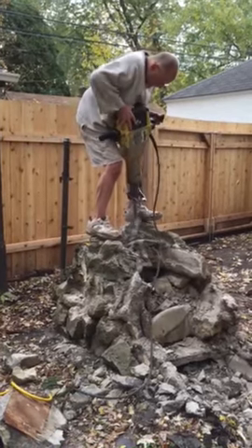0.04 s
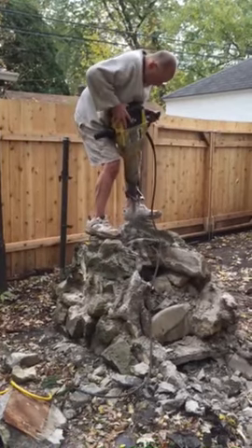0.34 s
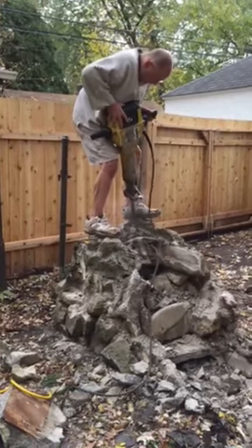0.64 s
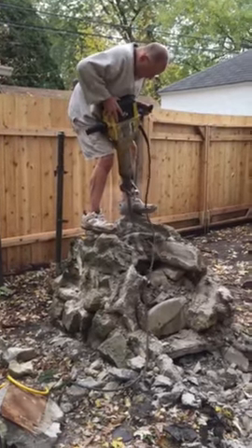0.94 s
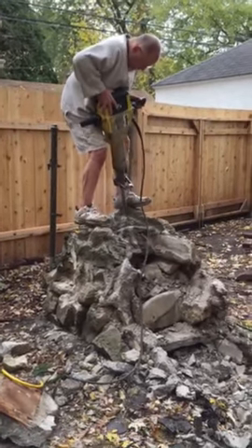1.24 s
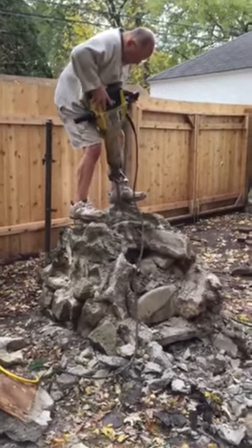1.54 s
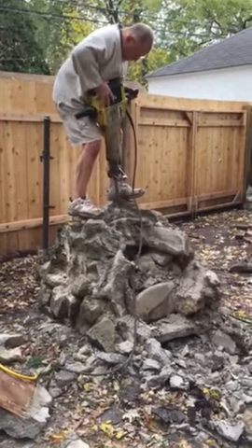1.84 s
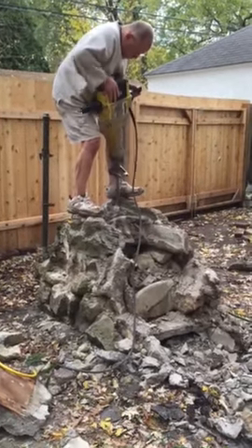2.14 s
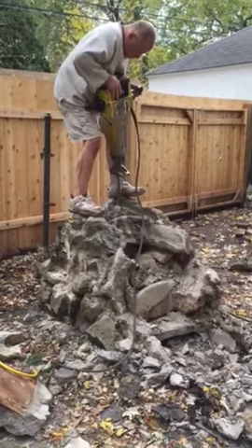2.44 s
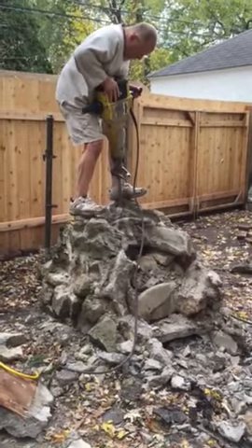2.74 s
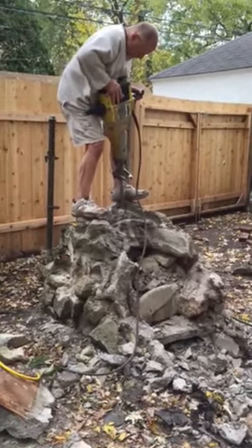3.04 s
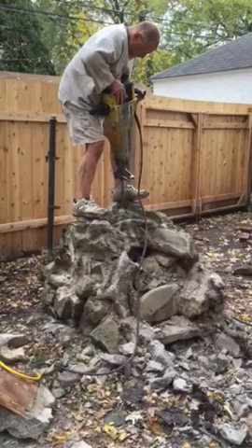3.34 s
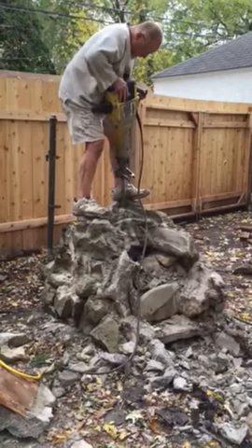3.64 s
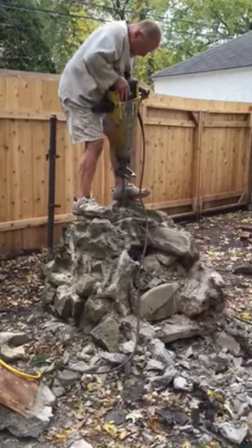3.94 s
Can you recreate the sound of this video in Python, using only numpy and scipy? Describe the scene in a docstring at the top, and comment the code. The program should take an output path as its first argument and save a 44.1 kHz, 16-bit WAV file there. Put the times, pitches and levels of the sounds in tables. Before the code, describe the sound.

A jackhammer breaks stone in a fast, even rattle of gritty cracks and ringing metal, growing slightly fuller as it goes. Its motor whirs faintly underneath, heard from a few metres off with a short outdoor echo.

```python
"""An electric jackhammer breaks rock and concrete in a fenced yard, fifteen blows a second.
Each blow cracks the stone, sets the steel chisel ringing and thuds through the housing,
never twice alike. Rubble, fence and house throw the sound back. Underneath, the fan rushes
and the gears whine, sagging in pitch as the piston loads."""
import sys
import numpy as np
from scipy import signal
from scipy.fft import rfft, irfft
from scipy.io import wavfile
from scipy.ndimage import uniform_filter1d

SR = 44100
rng = np.random.default_rng(int(sys.argv[2]) if len(sys.argv) > 2 else 0)


def store_wav(level_fs):
    """Save 16-bit WAV to argv[1]."""
    pcm = np.round(np.clip(np.atleast_2d(level_fs), -1, 1) * 32767)
    wavfile.write(sys.argv[1], SR, pcm.T.astype(np.int16))


N = 176400

# one row per blow: t/s, then level/dB of the crack and of the low, high and top chisel ring
BLOW_CUES = [(0.041, -10.5, -26, -23.5, -31), (0.1071, -9.5, -32, -32, -37), (0.1772, -13, -36, -32, -43),
             (0.244, -10, -24.5, -23, -25), (0.3114, -9.5, -30, -28, -37), (0.3798, -12.5, -33, -41, -42),
             (0.4466, -12, -27, -20, -32), (0.5143, -10.5, -28.5, -19.5, -20.5),
             (0.579, -9.5, -34, -25, -19), (0.646, -16.5, -29.5, -26.5, -25.5),
             (0.713, -15.5, -26.5, -22, -34), (0.7797, -10.5, -24.5, -21.5, -25),
             (0.845, -13, -36, -28, -32), (0.9149, -13, -30.5, -26.5, -30), (0.9824, -12, -37, -32, -34),
             (1.0503, -10.5, -26, -26, -47), (1.117, -11.5, -18, -28.5, -50),
             (1.1835, -13, -27.5, -27, -32.5), (1.249, -16, -36, -31.5, -32.5),
             (1.315, -14.5, -36, -22, -33), (1.3811, -12.5, -29, -22, -28),
             (1.4471, -14, -27.5, -27.5, -34), (1.5133, -12, -41, -20.5, -36),
             (1.5787, -11.5, -30, -23.5, -43), (1.6464, -12.5, -31, -22.5, -35),
             (1.7111, -12, -31, -23.5, -39), (1.7786, -15, -38, -26, -37), (1.8443, -12, -34, -27, -36),
             (1.9114, -13, -29, -26, -29), (1.9773, -14, -36, -27.5, -31.5), (2.0435, -16, -52, -35, -43),
             (2.1088, -15, -34, -32.5, -46), (2.1748, -11.5, -32, -24, -26), (2.241, -15, -49, -26.5, -31),
             (2.3061, -12.5, -29, -25.5, -23.5), (2.3735, -12.5, -35, -32, -25),
             (2.4387, -13, -25, -20, -24.5), (2.5064, -12, -25, -17, -24), (2.5746, -15, -57, -40, -33.5),
             (2.6418, -13.5, -28, -30, -28), (2.709, -14, -47, -26.5, -28.5), (2.775, -13.5, -40, -51, -29),
             (2.842, -10, -43, -26, -25.5), (2.908, -11, -44, -37, -35), (2.9747, -15, -44, -38, -25),
             (3.0396, -11, -48, -31, -29), (3.105, -12, -37, -31.5, -32), (3.171, -12, -45, -32, -21),
             (3.2366, -12, -33, -36, -21.5), (3.3026, -14.5, -50, -49, -31.5),
             (3.3689, -13.5, -36, -35.5, -23), (3.434, -13, -50, -40, -31.5),
             (3.5015, -13.5, -51, -55, -36), (3.567, -14, -57, -42, -32), (3.6337, -12.5, -53, -42, -32.5),
             (3.6998, -13.5, -40, -33.5, -28.5), (3.768, -11.5, -49, -58, -47),
             (3.834, -13.5, -53, -53, -36), (3.9013, -12.5, -53, -44, -41), (3.9696, -11.5, -55, -34, -42)]
# tone of steel on stone: f/Hz, level/dB
CRACK_EQ = [(400, -15), (900, -5), (2400, -0.5), (4300, -3.5), (4850, -7), (5600, 0.5), (7200, -11),
            (9300, -12.5), (11500, -7.5), (13500, -14.5), (14800, -20), (16500, -15.5)]
# midrange ride on the stone as the chisel beds in: t/s, level/dB
KNOCK_RIDE = [(0, -7.5), (3.3, -2), (4, 5)]
# chisel modes, in three families struck together: f/Hz, level/dB
RING_LOW = [(3205, -5), (3241, 0.5)]
RING_HIGH = [(5211, -1.5), (5375, -36), (5545, -4), (5717, 0.5), (6449, -8), (7510, -5.5), (7644, -12.5),
             (9330, -20), (10061, -9.5), (12936, -9.5), (13087, -11)]
RING_TOP = [(11111, 4.5), (15848, -10), (16274, -4)]
# trim and nominal decay of the low, high and top family: level/dB, t60/s
RING_FAMILIES = [(6.5, 0.18), (4.5, 0.22), (4.5, 0.23)]
# the thud, its recoil and their echo: delay/s, level/dB, low-pass f/Hz
THUD_TAPS = [(.0015, -7, 2500), (.0063, 1, 1200), (.0076, -8, 900), (0.0298, -9.5, 1480)]
# weight of the thud as the chisel beds in: t/s, level/dB
THUD_RIDE = [(0, -18), (.5, -14.5), (1.1, -21), (1.6, -15), (4, -11.5)]
# boom of ground and housing: f/Hz, level/dB, t60/s
BODY_RESONANCES = [(82, -37, 0.29), (150, -20, .065), (193.4, -13, 0.16), (321.6, -8, 0.26),
                   (342.6, -11, 0.082)]
# knock of the rock under the chisel: f/Hz, level/dB, t60/s
ROCK_RESONANCES = [(632, 0, 0.02), (775.4, -8.5, 0.047), (960, -8.5, 0.016), (1457, -5, 0.022)]
# how firmly the rock answers: t/s, level/dB
ROCK_RIDE = [(0, -1), (1.3, -2), (4, 0.5)]
# tone of the yard's reflections: f/Hz, level/dB
YARD_EQ = [(150, -12), (300, 2), (440, -18), (700, 0.5), (2300, -2), (4200, -0.5), (4850, -8), (5600, 2),
           (7200, -8), (12500, -9), (14800, -12)]
# gear whine through one stroke: position/stroke, f/Hz, level/dB
GEAR_SWEEP = [(.35, 2195, -7), (.73, 2088, -11), (0.801, 1945, 2.5), (.93, 1768, -6.5), (1, 1683, -11)]
# tone of the fan rush: f/Hz, level/dB
FAN_EQ = [(25, -36), (70, 0.5), (320, -3.5), (440, -1), (1500, 2), (5000, -1.5), (14000, -25)]

CRACK_DB, CRACK_TINT_DB, BOUNCE_DB, BOUNCE_S = 5, 3.5, -9, 0.0068
RING_RISE_S, RING_CHOKE_DB, RING_WOBBLE, RING_ECHO = 0.0085, -3, .48, .4
DETUNE_HZ, GRIP_SCATTER, MODE_SCATTER_DB, WEAK_FOLLOW = 8, .18, 3, .6
THUD_SCATTER_DB, THUD_JITTER_S = .7, .00012
YARD_DB, YARD_RISE_S, FENCE_DB, FENCE_S = -5.5, 0.0017, -3, 0.0258
GEAR_DB, GEAR_OCTAVE_DB, GEAR_ROUGH, GEAR_WANDER = -28, -12, .75, .025
FAN_DB, MOTOR_RISE_DB_PER_S = -31, 1.23
LOW_CUT_HZ, HIGH_CUT_HZ, CEILING = 42, 17000, 1.15


def cracks(blows):
    """Steel hits stone: a tight burst of grit, freshly coloured each time, then a softer bounce."""
    out, t = np.zeros(N), np.arange(2048) / SR
    hit, bounce = (swell(t - delay, rise=0.00061, decay=0.0017, hold=0.0031) for delay in (0, BOUNCE_S))
    envelope = np.hypot(hit, undb(BOUNCE_DB) * bounce)
    grit, f = noise(CRACK_EQ), np.fft.rfftfreq(len(t), 1 / SR)
    bands_hz = np.geomspace(500, 17000, 18)
    for k, (start, db) in enumerate(blows[:, :2]):
        tint = undb(CRACK_TINT_DB * np.interp(f, bands_hz, rng.standard_normal(len(bands_hz))))
        grain = grit[k * len(t):(k + 1) * len(t)]
        burst = unit(irfft(rfft(grain) * tint))
        add(out, start, undb(db + CRACK_DB) * envelope * burst)
    return out


def bedding(stone):
    """The stone's mids go from scooped to full as the chisel sinks in."""
    mids = signal.sosfiltfilt(signal.butter(1, [1050, 1710], "band", fs=SR, output="sos"), stone)
    return stone + mids * (ride(KNOCK_RIDE) - 1)


def chisel(blows):
    """The struck steel rings, shorter when the stone grips it; the next blow partly chokes the tail."""
    out, t = np.zeros(N), np.arange(SR // 6) / SR
    period = np.median(np.diff(blows[:, 0]))
    choke = undb(RING_CHOKE_DB * np.clip((t - period) / RING_RISE_S + 1, 0, 1))
    echo = np.clip((t - FENCE_S) / YARD_RISE_S, 0, 1)  # returns off the fence, in or out of phase
    families = zip([RING_LOW, RING_HIGH, RING_TOP], RING_FAMILIES, blows[:, 2:].T)
    for modes, (family_db, t60), struck_db in families:
        grip = np.exp(GRIP_SCATTER * rng.standard_normal((len(blows), 1)))
        decay_s = t60 / np.log(1000) / grip
        envelopes = swell(t, RING_RISE_S, decay_s) * choke * np.sqrt(2 * np.sqrt(grip))
        lead_db = max(db for _, db in modes)
        for hz, db in modes:
            ring = np.zeros(N, complex)
            scatter, detune, phase, echo_phase = rng.standard_normal((len(blows), 4)).T
            hit_db = struck_db
            if db < lead_db:  # weaker modes follow the accents only in part
                hit_db = WEAK_FOLLOW * struck_db + (1 - WEAK_FOLLOW) * struck_db.mean()
                hit_db += MODE_SCATTER_DB * scatter
            for k, start in enumerate(blows[:, 0]):
                tone = np.exp(2j * np.pi * ((hz + DETUNE_HZ * detune[k]) * t + phase[k]))
                tone *= 1 + RING_ECHO * np.exp(2j * np.pi * echo_phase[k]) * echo
                add(ring, start, undb(hit_db[k] + family_db + db) * envelopes[k] * tone)
            out += (ring * (1 + RING_WOBBLE * wobble(rate_hz=170))).real
    return out


def thuds(blows):
    """The low punch: blow and recoil knock housing, ground and rock, and slap back off the fence."""
    pushes, t = np.zeros(N), np.arange(SR // 5) / SR
    weight_db = np.interp(blows[:, 0], *np.array(THUD_RIDE).T)
    for delay, tap_db, cutoff_hz in THUD_TAPS:
        contact = signal.sosfilt(signal.butter(2, cutoff_hz, fs=SR, output="sos"), 1. * (t == 0))
        for start, db in zip(blows[:, 0], weight_db):
            scatter, jitter = rng.standard_normal(2)
            gain = undb(db + tap_db + THUD_SCATTER_DB * scatter)
            add(pushes, start + delay + THUD_JITTER_S * jitter, gain * contact)

    def resonate(modes):
        partials = (undb(db - 60 * t / t60) * np.cos(2 * np.pi * hz * t) for hz, db, t60 in modes)
        return signal.fftconvolve(pushes, sum(partials))[:N]

    return resonate(BODY_RESONANCES) + resonate(ROCK_RESONANCES) * ride(ROCK_RIDE)


def yard(blows):
    """Each crack scatters off the rubble in a short tail, with a slapback from the fence."""
    power, t = np.zeros(N), np.arange(SR // 3) / SR
    rubble = swell(t, YARD_RISE_S, decay=0.032)
    fence = undb(FENCE_DB) * swell(t - FENCE_S, rise=0.0039, decay=0.0078)
    for start, db in blows[:, :2]:
        add(power, start, undb(db + YARD_DB) ** 2 * (rubble ** 2 + fence ** 2))
    return np.sqrt(power) * noise(YARD_EQ)


def motor(blows):
    """A slowly building bed: fan rush, and gears that squeak and sag as the piston compresses."""
    t = np.arange(N) / SR
    starts = np.append(blows[:, 0], 2 * blows[-1, 0] - blows[-2, 0])
    stroke = np.interp(t, starts, np.arange(len(starts))) % 1  # 0 to 1 between blows
    position, sweep_hz, load_db = np.array(GEAR_SWEEP).T
    pitch_hz = np.interp(stroke, position, sweep_hz) * (1 + GEAR_WANDER * wobble(rate_hz=30.5).real)
    tone = np.exp(2j * np.pi * np.cumsum(pitch_hz) / SR)
    teeth = (tone + undb(GEAR_OCTAVE_DB) * tone ** 2) * (1 + GEAR_ROUGH * wobble(rate_hz=500))
    whine = undb(GEAR_DB + np.interp(stroke, position, load_db)) * teeth.real
    fan = undb(FAN_DB) * noise(FAN_EQ)
    return (whine + fan) * undb(MOTOR_RISE_DB_PER_S * t)


def undb(db):
    """Decibels to gain."""
    return 10 ** (np.asarray(db) / 20)


def ride(points):
    """A fader move: gain through (t/s, level/dB) points."""
    return undb(np.interp(np.arange(N) / SR, *np.array(points).T))


def unit(x):
    """Normalise to rms 1."""
    return x / np.sqrt(np.mean(np.abs(x) ** 2))


def noise(eq):
    """Noise of rms 1, coloured by (f/Hz, level/dB) points."""
    hz, db = np.array(eq).T
    f = np.maximum(np.fft.rfftfreq(N, 1 / SR), 1)
    colour = undb(np.interp(np.log(f), np.log(hz), db))
    return unit(irfft(rfft(rng.standard_normal(N)) * colour, N))


def wobble(rate_hz):
    """A smooth random modulator of amplitude and phase, rms 1."""
    width = int(SR / rate_hz)
    z = rng.standard_normal((2, N))
    z = uniform_filter1d(uniform_filter1d(z, width, mode="wrap"), width, mode="wrap")
    return unit(z[0] + 1j * z[1])


def swell(t, rise, decay, hold=0):
    """Envelope with linear attack, hold and exponential release; times in seconds."""
    return np.clip(t / rise, 0, 1) * np.exp(-np.maximum(t - rise - hold, 0) / decay)


def add(out, start, sound):
    """Mix a sound in at `start` seconds."""
    i = int(round(start * SR))
    lo, hi = max(i, 0), min(i + len(sound), N)
    if hi > lo:
        out[lo:hi] += sound[lo - i:hi - i]


def scene():
    """The hammer at work a few metres away, in mono."""
    lead_in = np.median(BLOW_CUES, axis=0)  # already running: one blow lands just before the start
    lead_in[0] = 2 * BLOW_CUES[0][0] - BLOW_CUES[1][0]
    blows = np.vstack([lead_in, BLOW_CUES])
    stone = bedding(cracks(blows) + yard(blows))
    return (stone + chisel(blows) + thuds(blows) + motor(blows))[None]


def record(dry):
    """The microphone cuts the rumble, soft-clips the hottest peaks and trims the top."""
    dry = signal.sosfilt(signal.butter(2, LOW_CUT_HZ, "high", fs=SR, output="sos"), dry)
    clipped = dry / (1 + (dry / CEILING) ** 6) ** (1 / 6)
    return signal.sosfilt(signal.ellip(8, .2, 60, HIGH_CUT_HZ, fs=SR, output="sos"), clipped)


dry = scene()
out = record(dry)
store_wav(out)
```